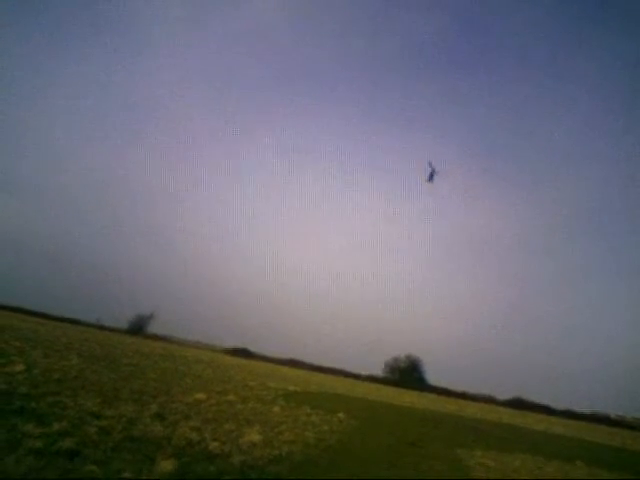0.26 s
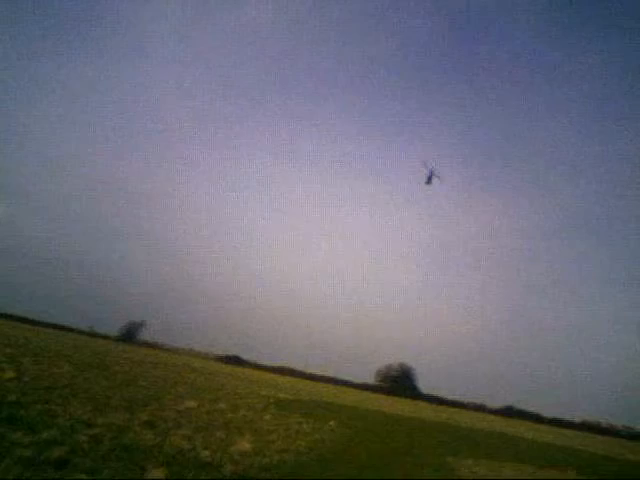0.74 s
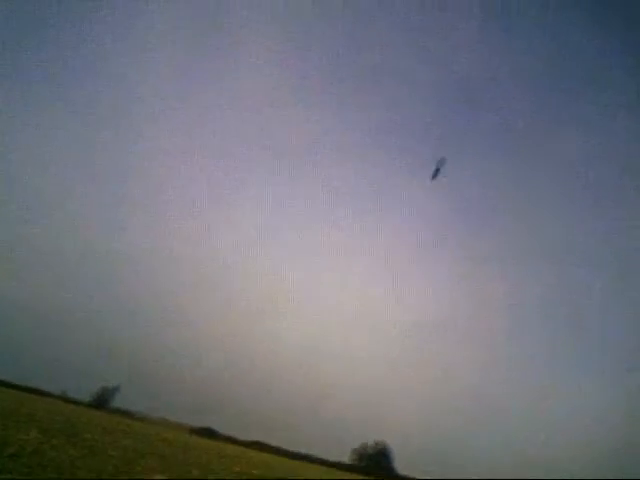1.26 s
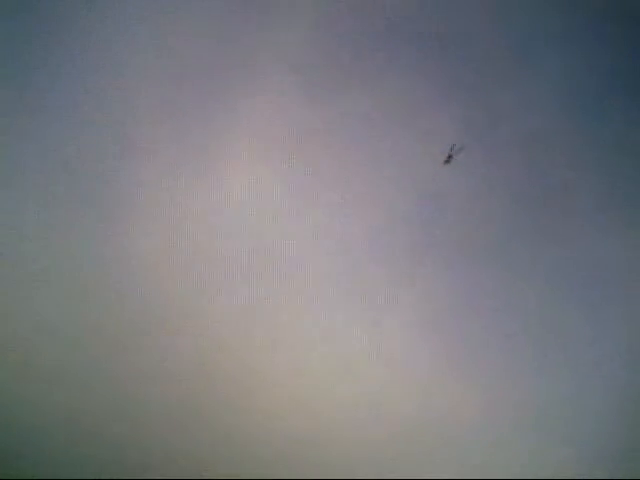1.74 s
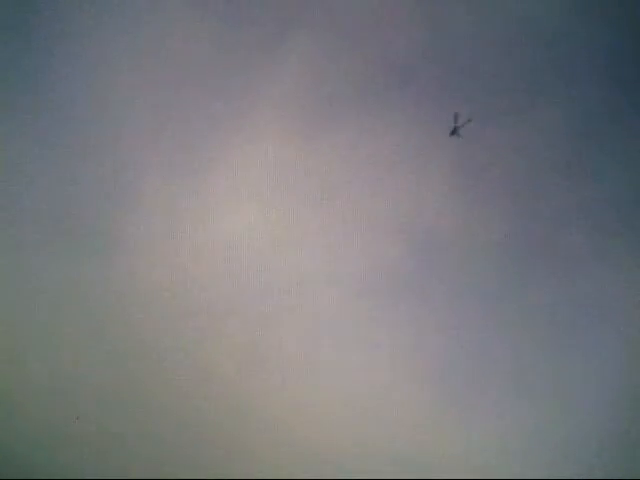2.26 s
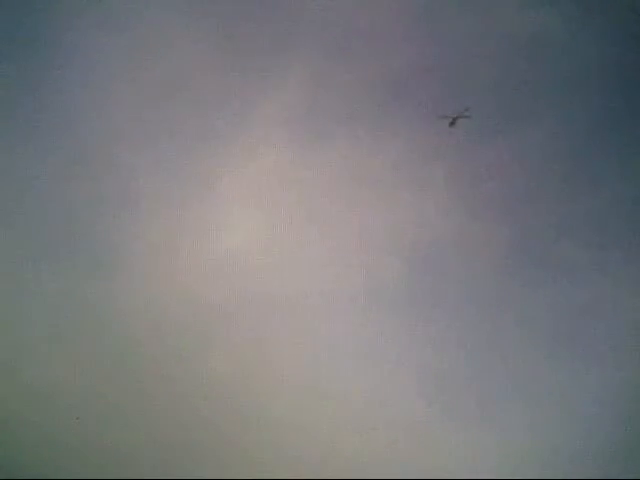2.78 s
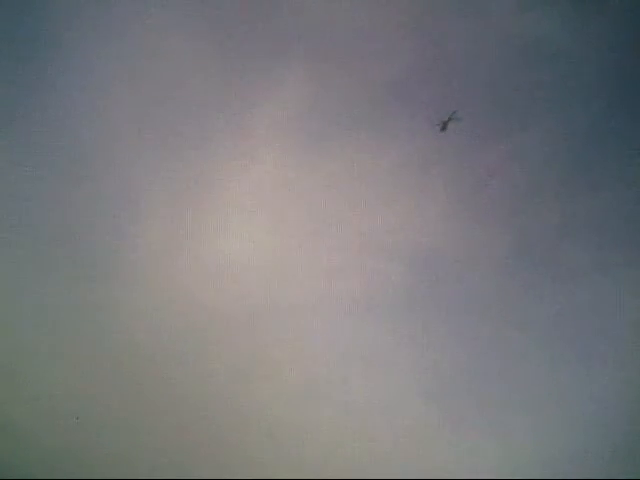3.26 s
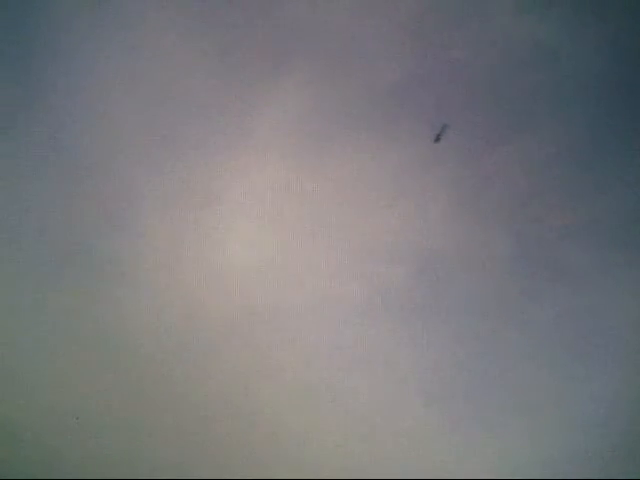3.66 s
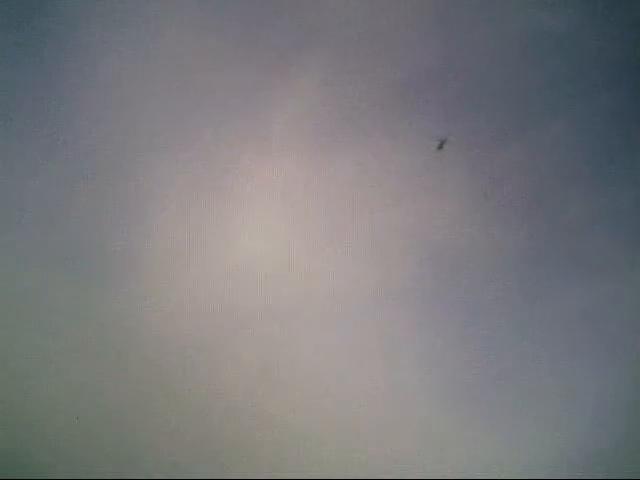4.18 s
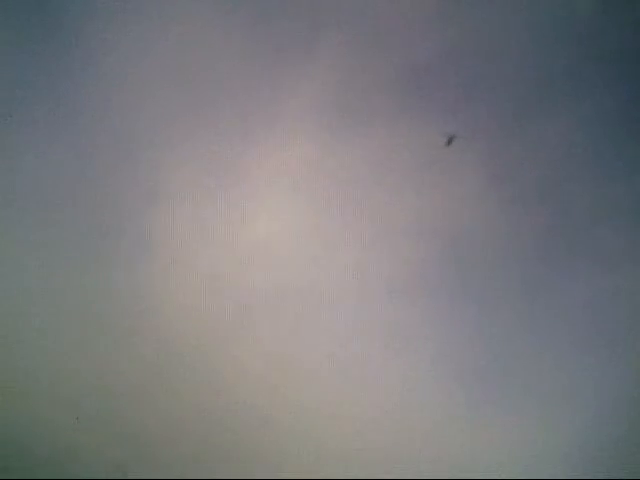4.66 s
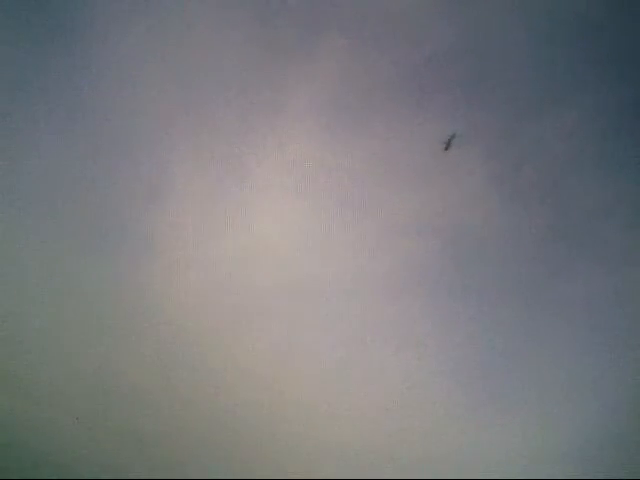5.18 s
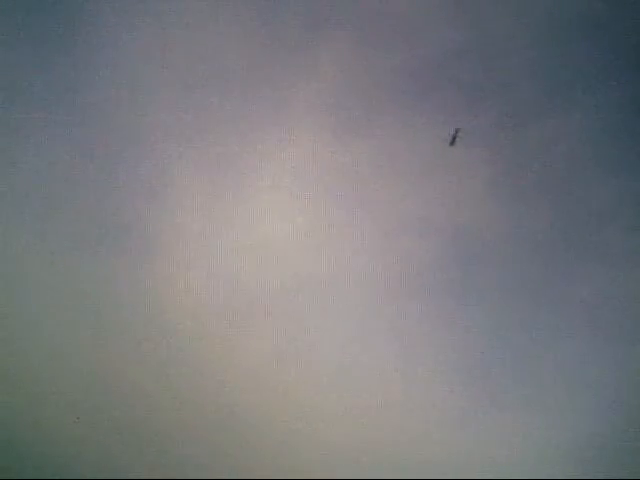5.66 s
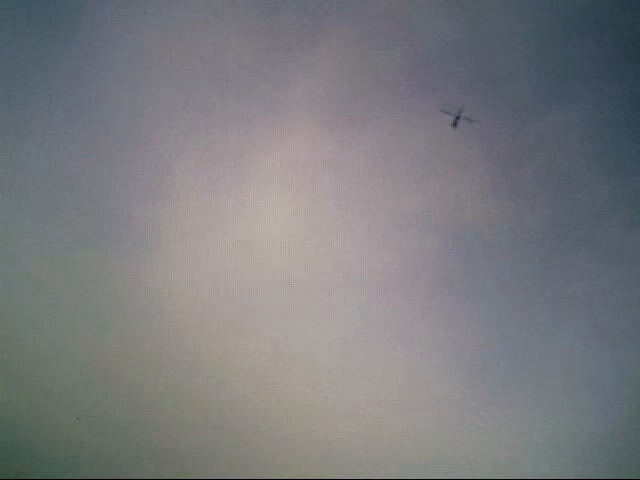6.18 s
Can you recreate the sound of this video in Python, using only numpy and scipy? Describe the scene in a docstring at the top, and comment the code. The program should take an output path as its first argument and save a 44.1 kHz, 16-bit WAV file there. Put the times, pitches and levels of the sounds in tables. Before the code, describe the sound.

A small two-stroke model helicopter flies over an open field, heard through a toy-grade microphone. From 0 s it runs at high revs, a raspy buzz firing about 250 times a second, with a throbbing, shrill gear whine and noisy air rush. A low wind gust bumps the microphone near 0.7 s. Around 0.9 s the engine takes load and bogs down, pitch sliding to about 200 firings a second by 2 s, the bark harder and brighter and the whine steadier. From 2.1 s it revs up again, quickly then gradually, the gear whine fading around 2.6 to 3.4 s while hollow, sweeping colouration shifts through the sound. By 4.5 s it is almost back to full speed and holds a fluttering drone, airier near 5.2 s and after 6 s, until it cuts off at 6.4 s. Light gusts come and go. Everything is gritty, metallic and harshly lo-fi.

```python
"""A small model helicopter climbs over a field, heard through a toy-grade recorder with a breeze on its microphone.
At first the two-stroke fires about 250 times a second; near 0.9 s it bogs down under load, to 200 by 2 s.
It then recovers, back near full speed by 4.5 s, as gusts come and go. Sines locked to one crank make the
bark, whine and hums; a second path sweeps notches through the engine and gears, and shaped noise makes rush and wind.
Last, the recorder samples slowly, holds each value, cuts the top and sits off zero."""
import sys
import numpy as np
from scipy import signal
from scipy.fft import rfft, irfft
from scipy.io import wavfile
from scipy.ndimage import uniform_filter1d

SR = 44100
rng = np.random.default_rng(int(sys.argv[2]) if len(sys.argv) > 2 else 0)


def wav_record(signal):
    """Record a signal, one row per channel, as 16-bit PCM in the file named by sys.argv[1]."""
    frames = np.transpose(np.atleast_2d(signal))
    bounded = np.clip(frames, -1, 1)
    # unit amplitude maps onto the largest positive 16-bit level
    quanta = np.round(bounded * 32767).astype(np.int16)
    wavfile.write(sys.argv[1], SR, quanta)


N = 283563
TIME_S = np.arange(N) / SR


def from_db(db):
    """Amplitude gain of a level in dB."""
    return 10 ** (np.asarray(db) / 20)


def rms_one(x):
    """Scale to unit rms."""
    return x / np.sqrt(np.mean(x ** 2) + 1e-20)


def in_time(rows):
    """Read every column of a timed table at each sample, with straight lines between rows."""
    seconds, *columns = np.transpose(rows)
    return [np.interp(TIME_S, seconds, column) for column in columns]


def drift(rate_hz):
    """Slow random wander of spread 1: noise through two equal low-pass poles, made at every 40th sample."""
    step = 40
    pole = np.exp(-2 * np.pi * rate_hz * step / SR)
    noise = rng.standard_normal(N // step + 2002)
    slow = signal.lfilter([1], [1, -2 * pole, pole ** 2], noise)[2000:]  # drop the filter's start-up
    return np.interp(np.arange(N) / step, np.arange(len(slow)), rms_one(slow))


def coloured(spectrum):
    """Unit-rms noise shaped by (frequency [Hz], relative level [dB]) points on a log frequency axis."""
    hz, db = np.transpose(spectrum)
    bins_hz = np.maximum(np.arange(N // 2 + 1) * SR / N, 1)
    gain = from_db(np.interp(np.log(bins_hz), np.log(hz), db))
    return rms_one(irfft(rfft(rng.standard_normal(N)) * gain, N))


def tone(angle, db):
    """A sine of given rms level that flutters in the moving air, its start offset by up to half a cycle."""
    level = np.sqrt(2) * from_db(db + 0.76 * drift(13.6))
    return level * np.sin(angle + rng.uniform(0, np.pi))


# gusts on the microphone: (centre time [s], length between 1/e points [s], level before flutter [dB])
GUSTS = [(0.693, 0.17, -33.5), (.96, 0.17, -42), (1.12, .2, -43), (1.405, 0.3, -44), (1.727, .15, -43),
         (1.98, .15, -41), (2.407, 0.086, -37), (2.964, 0.21, -44), (4.35, 0.22, -45), (4.553, 0.11, -45),
         (4.79, 0.29, -46), (5.445, .15, -45), (6.068, 0.27, -39)]


def wind():
    """Lumpy low rumble on the microphone port: a light breeze, and gusts that swell and fade."""
    rumble = coloured([(12, -40), (30, -1), (60, -11.0), (140, -8), (260, -23.0), (600, -29.5)])
    breeze = from_db(-45 + 4.0 * drift(4.9))
    gusts = 0
    for centre_s, length_s, db in GUSTS:
        gusts = gusts + from_db(db) * np.exp(-(2 * (TIME_S - centre_s) / length_s) ** 2)
    return (breeze + gusts * from_db(2.5 * drift(21))) * rumble


# spectrum of the air rush: (frequency [Hz], relative level [dB])
RUSH_SPECTRUM = [(90, -42), (170, -16.5), (280, -4), (400, -4), (600, 1), (900, -2), (1400, 0.5),
                 (2200, 1.5), (3000, -3), (4000, -10), (6000, -7), (9000, -51)]


def air_rush(crank, rotor, load, rush_db):
    """Noise of moving air that puffs with each firing and swells twice per rotor turn; load adds bright hiss."""
    puffs = 1 + 0.097 * np.cos(crank)
    blade_swells = 1 + 0.17 * np.cos(2 * rotor)
    hiss = coloured([(1500, -68), (2800, 2), (4000, 6.0), (6000, -31), (9000, -20)])
    noise = coloured(RUSH_SPECTRUM) + load * from_db(-4.0) * hiss
    return from_db(rush_db + 0.73 * drift(13.0)) * puffs * blade_swells * noise


def rotor_hums(rotor, tail_db, shaft_db, low_db):
    """Tail blades, drive shaft with its octave, and a low hum, each turning at a fixed multiple of the rotor."""
    return (tone(9 * rotor, tail_db) + tone(10.5 * rotor, shaft_db)
            + tone(21 * rotor, shaft_db - 8) + tone(6 * rotor, low_db))


# overtone of the gear whine: (time [s], level before flutter [dB])
OVERTONE = [(0, -61), (.9, -46), (1.3, -43), (1.6, -34), (1.95, -35), (2.2, -42), (2.4, -35.5),
            (2.6, -37.5), (3.3, -44.5), (6.43, -60)]
PINION_TEETH = 10
# the whine throbs deeply until the rotor takes the load; depths are fractions of its amplitude
THROB_BEFORE, THROB_AFTER, THROB_FADES_S = 0.82, 0.049, (1, 1.13)


def gear_whine(crank, rotor, gear_db):
    """Pinion teeth meshing, a tone and a rougher octave above, throbbing once per rotor turn."""
    mesh = PINION_TEETH * crank
    overtone_db = in_time(OVERTONE)[0] + 3.1 * drift(30) + 1.6 * drift(2.7)
    overtone = tone(2 * mesh + 0.93 * drift(43), overtone_db)
    depth = np.interp(TIME_S, THROB_FADES_S, [THROB_BEFORE, THROB_AFTER])
    return (tone(mesh, gear_db) + overtone) * (1 + depth * np.cos(rotor))


# multiples of the firing rate in the bark: (order)
BARK_ORDERS = [3, 4, 5, 6, 7, 8, 9, 11, 12, 13, 14, 15, 16, 18, 19, 21]
# exhaust bark, one row per order, levels relative to the whole bark:
# (running free [dB], under load [dB], throb depth per rotor turn when unloaded [fraction])
BARK = [(-4, -3, 0.14), (-5, -3, 0.12), (-4, -5, -0.22), (0, -0.5, 0.011), (-6, 2.5, 0.0026),
        (-4.5, 4, 0.23), (-14.5, 8, -0.22), (-38, -7.5, .05), (-15.5, -11, 0.26), (-22, -9, .05),
        (-19.5, -5.5, .05), (-23.5, -7, .05), (-23, -7, -0.033), (-23, -3, .05), (-13.5, -11, .05),
        (-19.5, -3, -0.08)]
# silencer resonances: (centre [Hz], half-width to 1/e of the dB lift [Hz], lift at full load [dB])
SILENCER = [(1720, 210, 2.5), (2030, 50, 1), (2455, 59, 14.5)]
# as the load first bites, the seventh order surges while the sixth sags
BITE_S, BITE_LENGTH_S, BITE_DB = 0.96, 0.54, {7: 4.0, 6: -8}


def exhaust_bark(crank, rotor, speed_hz, load, bark_db):
    """Harmonics of the firing, rebalanced by load and lifted as they pass through the silencer's resonances."""
    bite = np.exp(-(2 * (TIME_S - BITE_S) / BITE_LENGTH_S) ** 2)
    bark = np.zeros(N)
    for order, (free_db, loaded_db, depth) in zip(BARK_ORDERS, BARK):
        lift_db = sum(db * np.exp(-((order * speed_hz - hz) / width_hz) ** 2)
                      for hz, width_hz, db in SILENCER)
        db = bark_db + free_db + load * (loaded_db - free_db + lift_db)
        db = db + BITE_DB.get(order, 0) * bite
        throb = 1 + (1 - load) * depth * np.cos(rotor)
        bark += tone(order * crank, db) * throb
    return bark


# second path from the airframe, its lag swinging as the craft turns: (time [s], lag [ms], negative = leads)
ECHO_LAG = [(0, -.61), (1.09, -.54), (1.18, -.38), (1.4, -.2), (1.63, .27), (1.87, .79), (2.28, 1.93),
            (2.43, 2.24), (2.8, 2.7), (3.9, 2.56), (4.7, 2.41), (5.3, 2.38), (5.9, 2.71), (6.43, 2.7)]
ECHO_DB = -3


def two_paths(x):
    """Direct sound plus a weaker, duller copy; together they cut moving notches."""
    dull = uniform_filter1d(x, size=11)
    samples = np.arange(N)
    lag = in_time(ECHO_LAG)[0] * SR / 1000
    return x + from_db(ECHO_DB) * np.interp(samples - lag, samples, dull)


# engine speed as heard: (time [s], firings per second [Hz])
SPEED = [(0, 248.6), (.8, 249.5), (.91, 249.6), (1.07, 236.8), (1.2, 227.6), (1.42, 214.2), (1.6, 206.4),
         (1.8, 201.9), (1.98, 200.6), (2.08, 202.7), (2.27, 214.2), (2.4, 221.7), (2.6, 229.6),
         (2.85, 234.6), (3.3, 240.2), (4.0, 245.5), (4.45, 248.6), (5.2, 250.0), (5.9, 251.4),
         (6.43, 250.8)]
GEAR_RATIO = 8.5  # crank turns per rotor turn
# near full speed the drive runs slack and the crank leads and lags; below it the drive is pulled taut
TAUT_BELOW_HZ, SLACK_ABOVE_HZ = 239, 245
WOBBLE_TAUT_RAD, WOBBLE_SLACK_RAD = 0.0083, 0.16


def crank_and_rotor(speed_hz):
    """Angles in radians: the crank leads and lags once per rotor turn, and never runs quite evenly."""
    mean_crank = 2 * np.pi * np.cumsum(speed_hz) / SR
    rotor = mean_crank / GEAR_RATIO + 2.4
    wobble = np.interp(speed_hz, [TAUT_BELOW_HZ, SLACK_ABOVE_HZ], [WOBBLE_TAUT_RAD, WOBBLE_SLACK_RAD])
    return mean_crank + wobble * np.sin(rotor) + 0.017 * drift(44), rotor


# as the craft turns and drifts, levels before flutter:
# (time [s], air rush [dB], second order [dB], bark [dB], gear whine [dB])
LEVELS = [(0, -28, -30, -34.5, -27), (.75, -31, -29.5, -34, -25), (.93, -27.5, -31, -30, -27),
          (1.06, -30.5, -32.5, -35, -34), (1.3, -32.5, -44, -32.5, -30), (1.75, -32.5, -41, -36.5, -28),
          (2.22, -33, -45.5, -36.5, -29), (2.42, -34, -53, -39.5, -38), (2.62, -33.5, -37, -37, -46),
          (3.4, -33, -37.5, -37, -48), (3.75, -32.5, -37.5, -36.5, -34), (4.6, -33, -34, -35.5, -35.5),
          (5.2, -29.5, -34, -34, -36), (5.6, -33, -31, -35, -32.5), (6.1, -28, -29, -34, -36),
          (6.43, -28, -33, -35.5, -43.5)]
# firing tone and rotor-locked hums, levels before flutter:
# (time [s], firing [dB], tail blades [dB], drive shaft [dB], low hum [dB])
HUMS = [(0, -45.5, -41.5, -43, -77), (.9, -44, -41, -38.5, -55), (1.3, -43, -40, -50, -71),
        (2.2, -43, -59, -53, -74), (2.5, -47, -53.5, -62, -59), (3.2, -59, -48, -50, -70),
        (4.5, -53, -47.5, -42, -51), (6.43, -45, -45.5, -39, -45)]
# load on the rotor, which brightens the bark: (time [s], load [0-1])
LOAD = [(0, 0.2), (.8, 0.28), (.98, 0.33), (1.15, 0.88), (2.3, 0.68), (2.6, 0.08), (3.3, 0), (3.8, 0.31),
        (5, 0.08), (6.43, 0.26)]


def helicopter():
    """Exhaust, gears, blades and air rush, all locked to one crank; exhaust and gears take two paths."""
    rush_db, second_db, bark_db, gear_db = in_time(LEVELS)
    first_db, tail_db, shaft_db, low_db = in_time(HUMS)
    load, speed_hz = in_time(LOAD)[0], in_time(SPEED)[0]
    crank, rotor = crank_and_rotor(speed_hz)
    engine = tone(crank, first_db) + tone(2 * crank, second_db)
    engine += exhaust_bark(crank, rotor, speed_hz, load, bark_db)
    engine_and_gears = two_paths(engine + gear_whine(crank, rotor, gear_db))
    hums = rotor_hums(rotor, tail_db, shaft_db, low_db)
    return engine_and_gears + hums + air_rush(crank, rotor, load, rush_db)


def scene():
    """The craft above the field, wind at the microphone."""
    return (wind() + helicopter())[None]


SAMPLE_HZ, CUTOFF_HZ = 8000, 12800
OFFSET = -.1664  # fraction of full scale


def record(dry):
    """Unfiltered slow sampling folds the treble down; holding each value mirrors the sound above; the top is cut."""
    held = np.floor(np.arange(N) * SAMPLE_HZ / SR) * SR / SAMPLE_HZ  # position of the latest slow sample
    steps = np.interp(held, np.arange(N), dry[0])
    top_cut = signal.ellip(12, .3, 70, CUTOFF_HZ, fs=SR, output="sos")
    return OFFSET + signal.sosfilt(top_cut, steps)[None]


dry = scene()
out = record(dry)
wav_record(out)
```